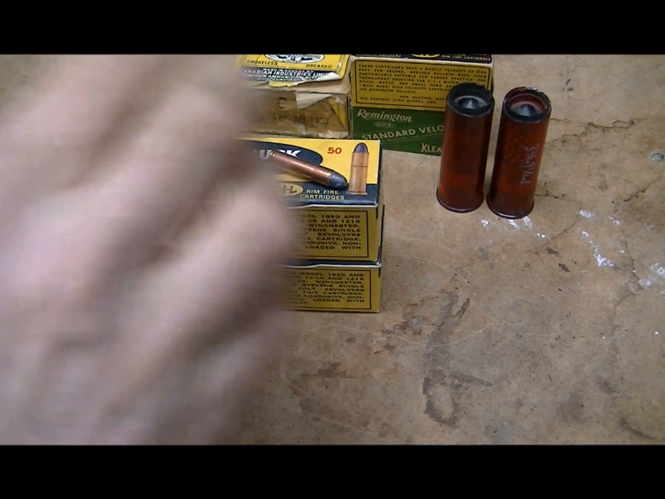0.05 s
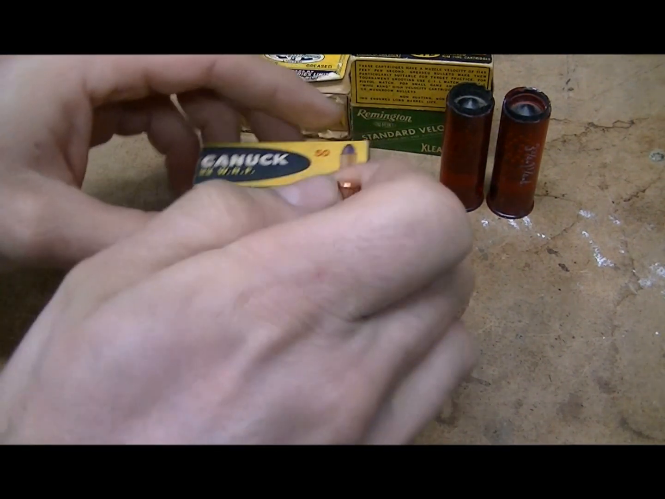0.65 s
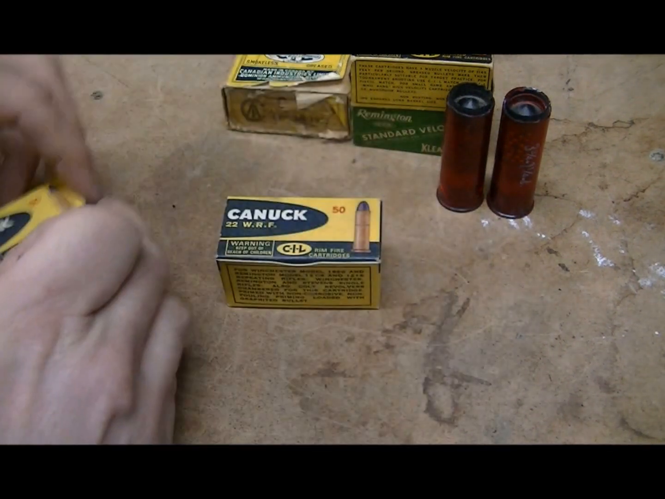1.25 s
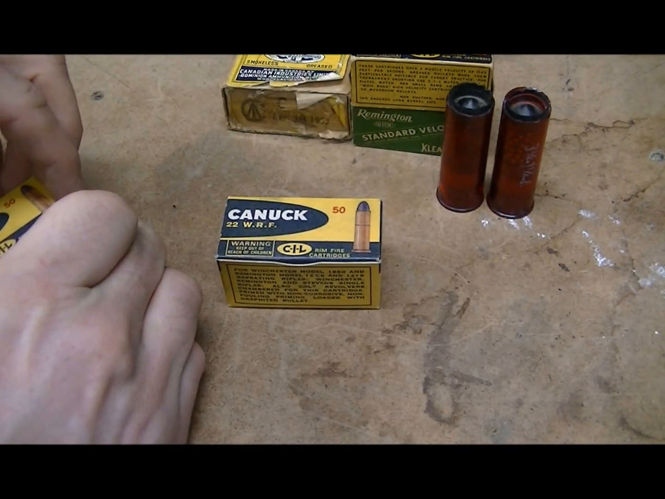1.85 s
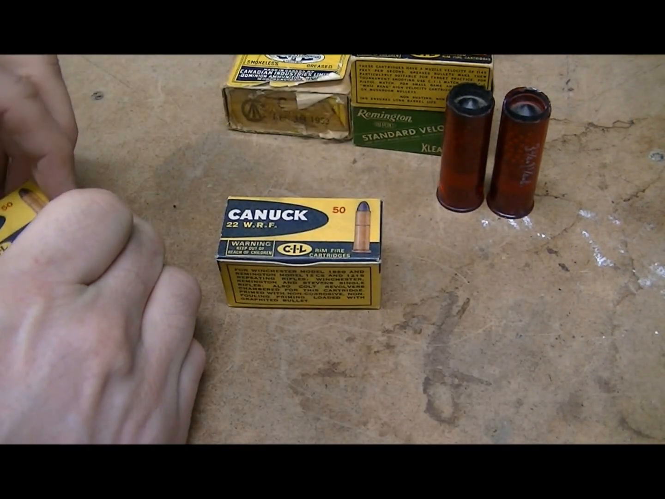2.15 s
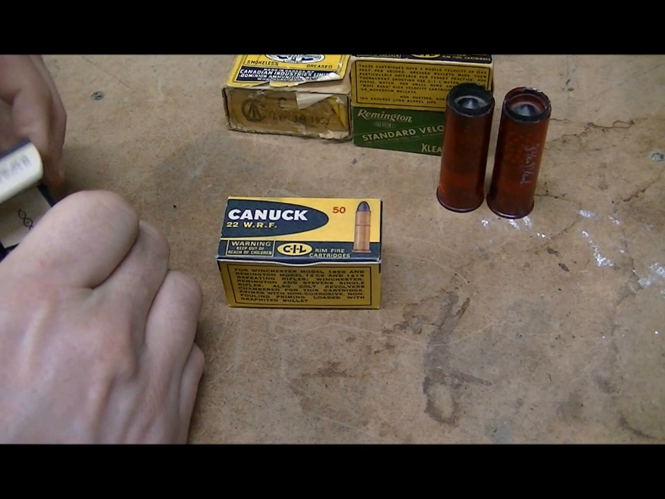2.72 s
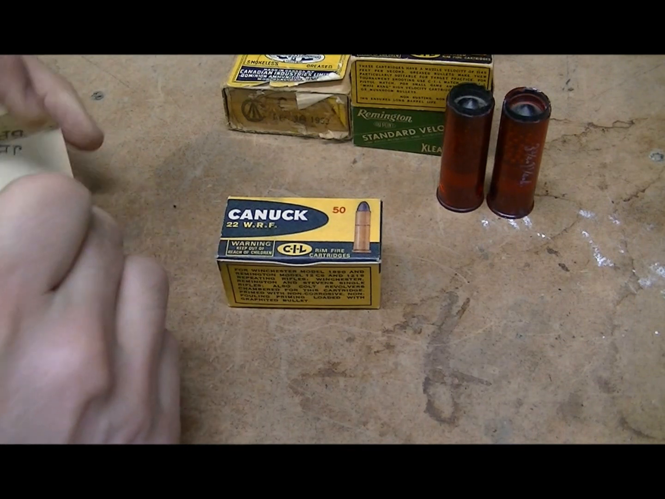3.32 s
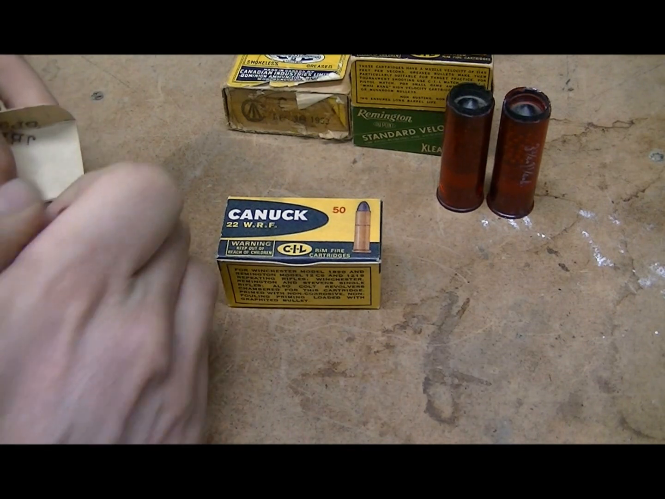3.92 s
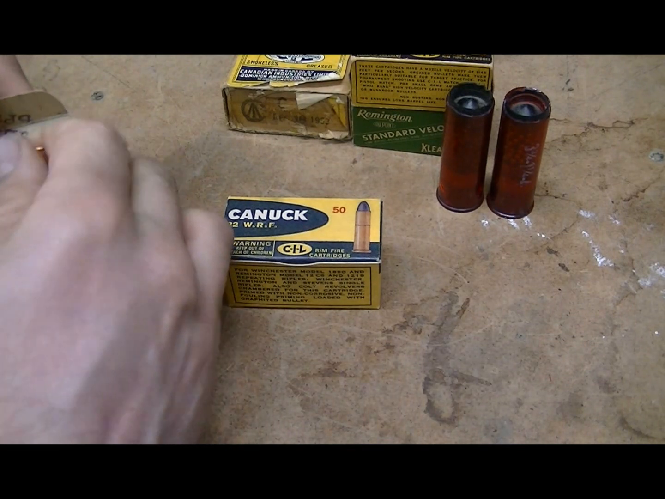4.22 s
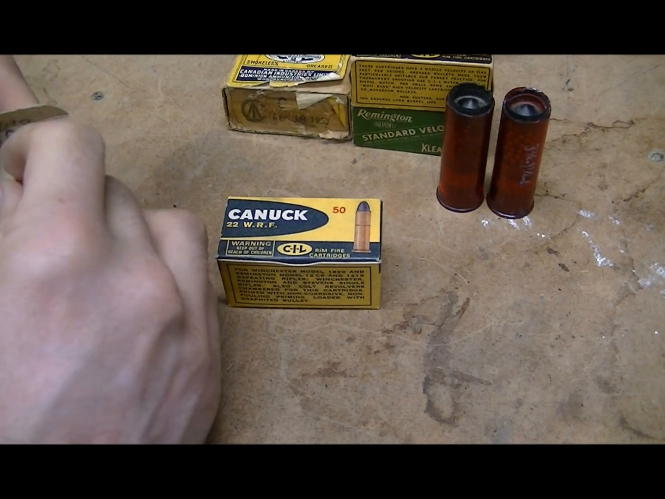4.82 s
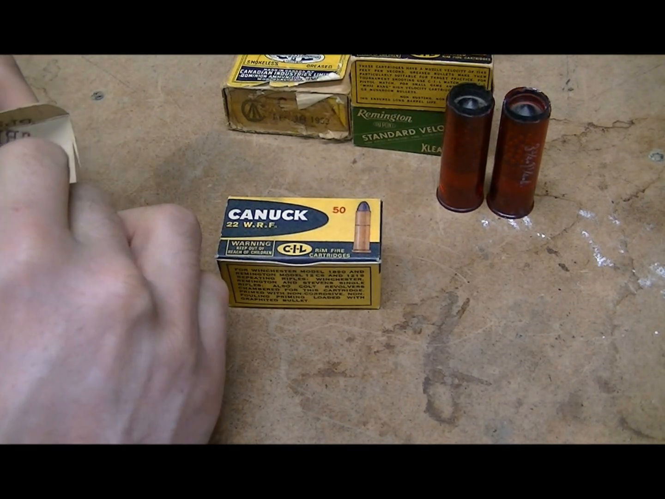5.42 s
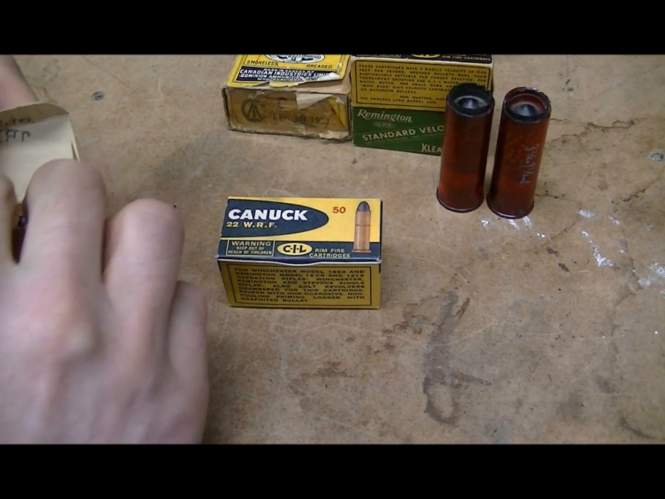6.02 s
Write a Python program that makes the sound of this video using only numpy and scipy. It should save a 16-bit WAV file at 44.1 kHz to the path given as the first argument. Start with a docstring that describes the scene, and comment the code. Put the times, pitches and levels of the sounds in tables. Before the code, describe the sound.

Fingers rub softly on a small, full cardboard box, with a few light clicks as it is lifted. It is set down on a bench with a firm knock and a brief low thump. After a quiet moment, a flap is pulled open with sharp snaps and dry scrapes. Fingers then reach inside, making a hollow rustle and more small clicks. The microphone is close, in a small quiet room.

```python
"""Hands lift a small, full cardboard box off another, skin rubbing on card with a fine stick-slip grain.
At 1.3 s the box is set down: its panels knock and the impact rings the modes of the bench top.
From 2.5 s the flap is pulled open, and card edges scrape and snap. From about 3.7 s fingers reach in
among the contents, and the resonances of the enclosed air turn the rubbing hollow.
Throughout, a camera microphone stands close by in a small quiet room."""
import sys
import numpy as np
from scipy import signal
from scipy.fft import rfft, irfft
from scipy.io import wavfile
from scipy.ndimage import uniform_filter1d

SR = 44100
rng = np.random.default_rng(int(sys.argv[2]) if len(sys.argv) > 2 else 0)


def bounce(signal):
    """Save signal as a 16-bit WAV file at the path given by the first command-line argument."""
    frames = np.transpose(np.atleast_2d(signal))
    limited = np.clip(frames, -1, 1)
    pcm = np.round(limited * 32767).astype(np.int16)
    wavfile.write(sys.argv[1], SR, pcm)


N = 267246
T = np.arange(N) / SR
USUAL_TOUCH_DB = -50  # reference level for light and heavy contact
SIDE = np.array([[1], [-1]])  # adds to the left channel, subtracts from the right

# Blows on the box. Each row: start in seconds, level in dB, main panel mode in Hz, swell time in ms,
# relative level of the crack in dB.
BOX_BLOWS = [(0.301, -30.5, 1050, 0.76, -7), (0.3045, -28.5, 674, .92, -6), (0.408, -40.5, 760, 0.91, 1.5),
             (1.3408, -9, 807, 1.75, -3.5), (1.3425, -17.5, 2110, 1.9, -19), (1.3459, -11, 1215, 0.74, 0),
             (1.3467, -11, 1710, 1, -8.5), (1.482, -30, 730, 2.6, -16), (2.3327, -23.5, 1526, 1.3, -0.5),
             (2.5444, -27, 760, 2, 12.5), (2.5509, -8.5, 1213, 1.37, -9.5), (2.558, -19, 1140, 1.2, -15),
             (2.5721, -20, 1950, 1.1, -8.5), (3.988, -39, 890, 2.9, 3.5), (4.6044, -38, 656, 4, -0.5)]
# Modes of a card panel. Each row: frequency as a multiple of the main mode, gain in dB.
PANEL_MODES = [(.33, -19), (.62, -14.5), (1, 4), (1.42, -31), (2.25, -27)]
# Spectrum of the contact crack. Each row: frequency in Hz, gain in dB.
CONTACT_SPECTRUM = [(180, -40), (300, -7), (688, -4), (1360, -4), (2200, -9.5), (2630, -16), (3210, -6.5),
                    (3860, -23.5), (4330, -10.5), (4870, -21), (5650, -14.5), (7370, -29.5), (10400, -23.5),
                    (14500, -45), (15800, -46)]
def box_knocks():
    """Impact excitation: the contact cracks, panel modes swell and die, the contents chatter dully."""
    out, t = np.zeros(N), T[:SR // 2]
    for start, db, hz, swell_ms, crack_db in BOX_BLOWS:
        age = t / (swell_ms / 1000)
        modes = sum(undb(mode_db) * np.sin(2 * np.pi * hz * ratio * t) for ratio, mode_db in PANEL_MODES)
        add(out, start, undb(db) * age * np.exp(1 - age) * modes)
        chatter = band(rng.standard_normal(len(t)), 1700, "lowpass", order=1) * fade(t, 0.094)
        grit = rng.standard_normal(len(t)) * fade(t, 0.038) + undb(-10.5) * chatter
        crack = unit(colour(grit, CONTACT_SPECTRUM)[:SR // 8]) / 8
        add(out, start, undb(db + crack_db) * crack)
    return out


# Weight landing on the bench. Each row: start in seconds, level in dB, low-pass cutoff of the push in Hz.
LANDINGS = [(.004, -42.5, 260), (.895, -43, 110), (1.3404, -24.5, 2200), (1.52, -41, 90),
            (2.547, -33.5, 110), (2.9, -43, 110)]
# Modes of the loaded bench top. Each row: frequency in Hz, gain in dB, time to decay 60 dB in seconds.
BENCH_MODES = [(88.6, -5.5, 0.44), (107.5, 2, 0.23), (185, -24, 0.13), (210, -2.5, 0.24), (234, -1.5, 0.29),
               (272, 4, 0.15), (370, 4.5, 0.14), (512, -9, 0.19), (552, 4, 0.14), (590, 1.5, 0.17),
               (707, 7, 0.11), (762, 4, 0.2), (846, 4, 0.18), (920, -15, 0.19), (1088, 0, 0.14),
               (1200, -6.5, 0.064), (1203, -2, 0.093), (1300, -10, 0.058), (1640, 2, 0.045)]
# Spectrum of the bench's many weaker modes. Each row: frequency in Hz, gain in dB.
RUMBLE_SPECTRUM = [(50, -18), (90, 2), (200, -2.5), (400, -5), (850, -2), (1400, -9), (3000, -26),
                   (15000, -60)]
def bench_thumps():
    """Free vibration: the bench rings in its strong modes, while the weak ones overlap into a rumble."""
    out, t = np.zeros(N), T[:SR // 2]
    modes = sum(undb(db) * np.cos(2 * np.pi * hz * t) * fade(t, t60) for hz, db, t60 in BENCH_MODES)
    ring = band(modes, 55, "highpass")
    for start, db, push_hz in LANDINGS:
        rumble = unit(colour(rng.standard_normal(len(t)), RUMBLE_SPECTRUM)) * fade(t, 0.21)
        add(out, start, undb(db) * band(ring + rumble, push_hz, "lowpass"))
    return out


# Card snapping and fingernails catching. Each row: start in seconds, level in dB, panel ring in Hz,
# relative level of the treble tick in dB.
CARD_SNAPS = [(0.052, -42, 2800, -35), (0.074, -34, 800, -28), (.459, -27, 4130, -40),
              (.49, -31, 2220, -30), (0.614, -25, 2260, -20), (.871, -28.5, 1690, -11),
              (.99, -17, 910, -25), (1.143, -34.5, 4720, -3.5), (1.938, -42, 1300, 6.5),
              (2.065, -45, 2500, 6), (2.6285, -10, 2970, -27), (2.842, -19, 1150, -30),
              (2.908, -20, 3400, -4), (2.951, -14.5, 3190, -29), (3.016, -34, 940, -20),
              (3.192, -32, 886, -16), (3.3, -34, 2250, -25), (3.347, -27, 2380, -24),
              (3.378, -33, 1100, -14), (3.404, -23, 2210, -28), (3.41, -23.5, 1740, -16),
              (3.452, -26, 2150, -22), (3.559, -30.5, 2110, -21), (3.603, -18.5, 2690, -29),
              (3.791, -31, 780, -18), (3.814, -22.5, 1680, -23), (4.914, -31, 1300, -29),
              (5.372, -37.5, 1300, 4), (5.39, -26, 1170, -32), (5.48, -25, 1220, -3.5),
              (5.517, -22.5, 1140, -24), (5.608, -18, 2500, -13.5), (5.696, -33.5, 2650, -8),
              (5.719, -27, 1250, -14), (5.741, -17, 2670, -28), (5.755, -31, 2600, -5),
              (5.765, -18.5, 1570, -20), (5.829, -35.5, 2600, -8)]
# Response of the open box to snaps and scrapes. Each row: frequency in Hz, gain in dB.
OPEN_BOX_SPECTRUM = [(150, -44), (250, -23), (291, -17), (571, -12), (687, -8), (946, -5.5), (1160, -1),
                     (1860, -8), (2510, 0), (2870, -6), (3830, -8), (4680, -7), (7260, -25), (9830, -24.5),
                     (14000, -39.5)]
def card_snaps():
    """Sudden release of strain: a fibre lets go with a click, a crumble and a heavily damped ring."""
    out, t = np.zeros(N), T[:SR // 12]
    rise_s = 0.0005  # the panel takes a moment to give
    envelope = (1 - np.exp(-t / rise_s)) * fade(t, 0.024)
    for start, db, hz, treble_db in CARD_SNAPS:
        fracture = rng.standard_normal(len(t)) + undb(12) * (t == 0)
        crack = colour(fracture * envelope, OPEN_BOX_SPECTRUM)
        tick = band(fracture * fade(t, 0.011), [5000, 12000], "bandpass", order=3)
        ring = np.sin(2 * np.pi * hz * t) * envelope
        click = undb(-8.5) * crack / abs(crack).max() + undb(treble_db) * tick / abs(tick).max()
        add(out, start, undb(db) * (click + undb(-10.5) * ring))
    return out


# Card edges dragging. Each row: start in seconds, length in seconds, level in dB, relative level of
# the body in dB, ring of the gripped panel in Hz.
EDGE_DRAGS = [(0.881, 0.019, -51, -2, 880), (1.016, 0.024, -48, 0.5, 1440), (2.523, .02, -36, -2.5, 3220),
              (2.541, .025, -34, -3, 1300), (2.641, 0.0112, -33, -6, 3530), (2.658, 0.019, -39, -9.5, 3360),
              (2.866, .023, -42, 0.5, 1600), (2.89, 0.0274, -38.5, -7, 4200), (2.956, 0.011, -41, -5, 3170),
              (3.145, 0.019, -46, -10, 2150), (3.244, .03, -47, 3, 2000), (3.456, .017, -45, -10, 2130),
              (3.567, 0.037, -43.5, -6, 2080), (3.597, 0.022, -38, 0.5, 2130), (3.648, .018, -49, -6, 2200),
              (3.778, 0.027, -50.5, 0.5, 2060), (4.152, 0.018, -48, 1, 1200),
              (4.239, 0.049, -50.5, 7, 1060), (4.326, 0.019, -43.5, -12, 4500),
              (4.595, 0.026, -49.5, 1, 1030), (4.876, 0.026, -51, -9, 2550), (4.907, 0.022, -55, -12, 1300),
              (4.974, 0.068, -51, -13, 3300), (5.249, .058, -56, -6, 3160), (5.343, 0.049, -51, -10, 3380),
              (5.393, 0.055, -59, -5, 1180), (5.463, 0.041, -49, -6, 1140), (5.5, 0.019, -47.5, -12, 1140),
              (5.598, 0.03, -48, -5, 2500), (5.616, 0.052, -46, -5, 2500), (5.711, 0.032, -46.5, -16, 1230),
              (5.748, 0.026, -39.5, -7, 2600), (5.862, 0.037, -47, -11, 2630)]
def edge_scrapes():
    """Forced vibration: the coarse slips of a dragging card edge drive a resonance of the held panel."""
    rasp, body, hiss = friction(OPEN_BOX_SPECTRUM, slips_per_s=4500, spread_db=1.5, patchy_db=1.5)
    out = np.zeros(N)
    for start, length, db, body_db, hz in EDGE_DRAGS:
        i = np.arange(int(start * SR), int((start + length) * SR))
        envelope = unit(signal.windows.tukey(len(i), alpha=0.42))
        # a lighter touch makes a duller rasp with less hiss
        pressure_db = db - USUAL_TOUCH_DB
        cutoff_hz = np.clip(4400 * undb(0.5 * pressure_db), 3400, 9000)
        hiss_db = -15 + 0.52 * pressure_db
        edge = unit(band(rasp[i], cutoff_hz, "lowpass", order=6))
        ring = unit(resonance(rasp[i] + body[i], hz, width_hz=300))
        drag = undb(-0.5) * edge + undb(body_db) * unit(body[i]) + undb(hiss_db) * unit(hiss[i])
        out[i] += undb(db) * envelope * (drag + undb(-2) * ring)
    return out


# Skin or box sliding. Each row: start in seconds, length in seconds, rasp level in dB, relative level
# of the hiss in dB.
SLIDES = [(-0.09, .21, -47, -29), (0.243, 0.054, -54, -17), (0.313, 0.15, -46, -7),
          (0.416, 0.16, -56, -1.5), (.607, .04, -53, -6), (.652, .128, -47, -5), (0.733, 0.14, -52, 0),
          (0.854, 0.13, -52, -5.5), (0.962, 0.099, -45, -6.5), (1.181, 0.082, -52.5, -3),
          (1.303, .125, -42, -10), (1.431, 0.11, -39.5, -7), (1.615, 0.067, -52.5, -4),
          (1.73, 0.089, -52, -6), (1.845, 0.12, -55, -5), (1.988, 0.12, -58, -5), (2.133, 0.057, -57.5, -7),
          (2.258, 0.044, -50.5, -8.5), (2.324, 0.023, -50.5, -11), (2.368, 0.041, -60.5, -1),
          (2.513, 0.13, -33.5, -14), (2.604, 0.089, -38, -13), (2.726, 0.14, -47, -15),
          (2.836, 0.14, -42.5, -10), (2.978, .075, -47.5, -10), (3.04, 0.087, -44, -9),
          (3.097, 0.22, -48.5, -9.5), (3.318, 0.097, -49, -9), (3.435, 0.098, -53.5, -7),
          (3.618, .058, -48, -16), (3.754, 0.17, -50.5, -3.5), (3.906, 0.16, -51, -4.5),
          (4.061, 0.14, -41.5, -7), (4.17, 0.15, -42.5, -12.5), (4.305, 0.14, -50.5, -10),
          (4.425, 0.12, -52.5, -13), (4.556, .115, -47, -11), (4.666, 0.14, -52.5, -12),
          (4.786, 0.054, -58, -10), (5.532, 0.091, -59, -11), (5.72, 0.18, -54, -11),
          (5.833, 0.18, -55.5, -4)]
# Faint rub of the hands holding the box. Each row: time in seconds, rasp level in dB.
GRIP_LEVELS = [(0, -61.5), (.6, -61), (1.55, -57.5), (2.2, -66), (2.48, -63.5), (2.72, -57), (3.7, -63),
               (4.5, -55.5), (5.1, -73.5), (6.06, -76)]
# Spectrum of skin rubbing on card. Each row: frequency in Hz, gain in dB.
SKIN_SPECTRUM = [(100, -38.5), (170, -14), (312, -7), (551, -0.5), (760, 0), (885, -4.5), (1070, -3),
                 (1390, -5.5), (2460, -9), (2870, -5.5), (5460, -14.5), (7120, -23.5), (10600, -18),
                 (14600, -34), (15800, -46)]
def rubbing():
    """Sliding friction: skin on card and box on bench make noise whose amplitude follows the speed."""
    rasp, body, hiss = friction(SKIN_SPECTRUM, slips_per_s=11000, spread_db=1.6, patchy_db=1.9)
    # grip and strokes add in power; the three rows are rasp, body and hiss
    grip_db = np.interp(T, *np.transpose(GRIP_LEVELS))
    power = undb(grip_db + np.array([[0], [1.5], [-8]])) ** 2
    skew, roundness = 0.86, 0.71  # speed over a stroke is a leaning arch
    for start, length, db, hiss_db in SLIDES:
        i = (T > start) & (T < start + length)
        progress = (T[i] - start) / length
        speed = abs(np.sin(np.pi * progress ** skew)) ** roundness
        body_db = -3.5 - 0.17 * (db - USUAL_TOUCH_DB)  # a lighter touch has a larger share of body
        power[:, i] += (speed * undb(db + np.array([[0], [body_db], [hiss_db]]))) ** 2
    return np.sum(np.sqrt(power) * [rasp, body, hiss], axis=0)


def friction(spectrum, slips_per_s, spread_db, patchy_db):
    """Stick-slip motion: tiny uneven slips ring the card in patches; returns rasp, body and hiss."""
    slips = (rng.random(N) < slips_per_s / SR) * rng.standard_normal(N)
    size_db = spread_db * np.minimum(rng.exponential(size=N), 4) + patchy_db * walk(130)
    card = colour(slips * undb(size_db), spectrum)
    rasp = band(card, [1600, 6200], "bandpass", order=4)
    body = band(card, 1600, "lowpass", order=4)
    hiss = band(card, 6200, "highpass", order=4)
    return unit(rasp), unit(body), unit(hiss)


def hand_echo(x, lag_s, echo_db):
    """Comb filtering: a reflection off the cupped hand, its lag wandering, interferes with the sound."""
    echo = np.interp(T - lag_s * np.exp(0.22 * walk(7)), T, x)
    return (x + undb(echo_db) * echo) / np.hypot(1, undb(echo_db))


# Air modes of the opened box. Each row: frequency in Hz, bandwidth in Hz, gain in dB.
AIR_MODES = [(1090, 99, 3.5), (2500, 115, 7.5), (4500, 150, 7), (8250, 350, -10)]
def box_cavity(rub):
    """Cavity resonance: as the fingers reach into the box, its air modes turn the rub hollow."""
    reach_s = (3.65, 4.33)
    inside = np.interp(T, reach_s, [0, 0.72])
    closed = undb(-0.8) * rub + undb(-14) * resonance(rub, 2150, width_hz=160)
    air = sum(undb(db) * drifting_mode(rub, hz, width_hz) for hz, width_hz, db in AIR_MODES)
    hollow = undb(-5.5) * rub + air
    return (1 - inside) * closed + inside * hollow


def drifting_mode(x, hz, width_hz):
    """Detuning: fingers reshape the cavity, so a mode drifts between a flat and a sharp tuning."""
    share = np.clip(0.5 + 0.5 * walk(11), 0, 1)
    detune = np.exp(0.03)
    flat, sharp = resonance(x, hz / detune, width_hz), resonance(x, hz * detune, width_hz)
    return (1 - share) * flat + share * sharp


def room(x, t60, wet_db):
    """Reverberation: diffuse reflections die quickly and differ in part at the left and right channels."""
    t = T[:SR // 2]
    envelope = fade(t, t60) * (t > 0.004)
    tails = [band(rng.standard_normal(len(t)), 8000, "lowpass", order=1) * envelope for _ in range(3)]
    both, left, right = (signal.oaconvolve(x, tail / np.linalg.norm(tail))[:N] for tail in tails)
    return undb(wet_db) * (both + undb(-10) * np.array([left, right]))


# Background common to both channels. Each row: frequency in Hz, relative spectral density in dB.
BACKGROUND_SPECTRUM = [(13, -29), (22, -3), (70, 6), (155, -3.5), (255, -4), (467, -8), (1070, -10.5),
                       (1800, -17.5), (3290, -17.5), (3680, -22), (4580, -23.5), (7110, -25.5),
                       (10700, -29), (14500, -33), (15800, -35)]
# Stereo width of the faint background noise, low rumble included, cut off above about 10 kHz. Each row:
# frequency in Hz, # relative spectral density in dB.
WIDTH_SPECTRUM = [(13, -30), (22, -8), (178, 2.5), (766, -2.5), (1290, -4), (7730, -19), (10200, -46),
                  (11000, -51), (15800, -58)]
def background():
    """Partly coherent noise: a steady low rumble and a faint hiss, largely alike in both channels but partly
    differing between them."""
    mid = unit(colour(rng.standard_normal(N), BACKGROUND_SPECTRUM))
    side = unit(colour(rng.standard_normal(N), WIDTH_SPECTRUM))
    return undb(-54.5) * (mid + undb(-9) * side * SIDE)


def undb(db):
    """Decibels to amplitude gain."""
    return 10 ** (np.asarray(db) / 20)


def unit(x):
    """Normalisation to rms 1."""
    return x / np.sqrt(np.mean(x ** 2))


def fade(t, t60):
    """Exponential decay that loses 60 dB in t60 seconds."""
    return np.exp(-np.log(1000) * t / t60)


def add(out, start, sound):
    """Superposition: mix a sound in at a start time in seconds."""
    i = max(int(start * SR), 0)
    out[i:i + len(sound)] += sound[:N - i]


def band(x, hz, kind, order=2):
    """Butterworth filter."""
    return signal.sosfilt(signal.butter(order, hz, kind, fs=SR, output="sos"), x)


def resonance(x, hz, width_hz):
    """Two-pole resonator with gain 1 at its centre."""
    return signal.lfilter(*signal.iirpeak(hz, hz / width_hz, fs=SR), x)


def colour(x, spectrum, size=8192):
    """Minimum-phase filter with the given (Hz, dB) spectrum, built by folding its cepstrum."""
    hz, db = np.transpose(spectrum)
    bins_hz = np.maximum(np.arange(size // 2 + 1) * SR / size, 1)
    gain = undb(np.interp(np.log(bins_hz), np.log(hz), db))
    cepstrum = irfft(np.log(gain))
    cepstrum[1:size // 2] *= 2
    cepstrum[size // 2 + 1:] = 0
    impulse_response = irfft(np.exp(rfft(cepstrum)))
    return signal.oaconvolve(x, impulse_response)[:len(x)]


def walk(rate):
    """Smooth random modulation of rms 1 that changes course rate times a second."""
    hold = max(int(SR / rate), 1)
    steps = np.repeat(rng.standard_normal(N // hold + 1), hold)[:N]
    return unit(uniform_filter1d(steps, hold))


def scene():
    """Superposition: the direct sound from straight ahead, its reflections and the background noise."""
    rub = box_cavity(hand_echo(rubbing(), lag_s=0.0011, echo_db=-7))
    direct = rub + edge_scrapes() + card_snaps()
    direct += band(box_knocks() + bench_thumps(), 53, "highpass")
    # the upper middle range leans slightly left
    lean = undb(-19) * resonance(direct, 2400, width_hz=1200) * SIDE
    # each channel catches its own share of the reflection off the bench
    treble = band(direct, 2500, "highpass", order=1)
    bench_echo = undb(-34) * np.interp(T - 0.0003, T, treble) * SIDE
    return direct + lean + bench_echo + room(direct, t60=0.18, wet_db=-19.5) + background()


def record(dry):
    """Soft saturation and band limiting: the camera rounds off the loudest peaks and cuts the top."""
    ceiling, top_hz = 0.82, 15800
    rounded = dry / (1 + (dry / ceiling) ** 4) ** (1 / 4)
    return signal.sosfilt(signal.ellip(8, 0.2, 70, top_hz, fs=SR, output="sos"), rounded)


dry = scene()
out = record(dry)
bounce(out)
```